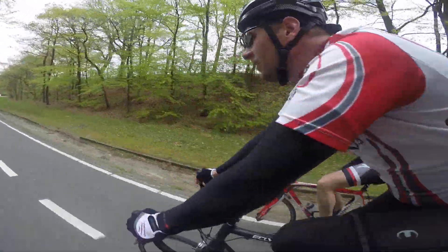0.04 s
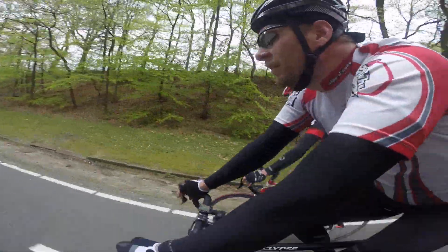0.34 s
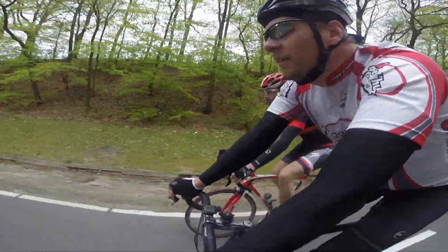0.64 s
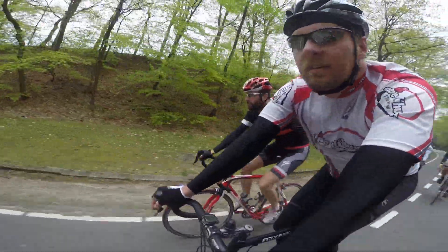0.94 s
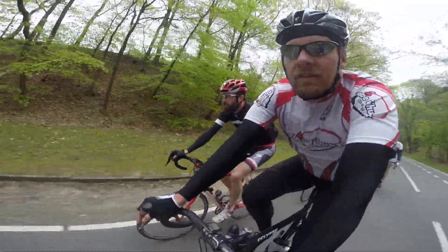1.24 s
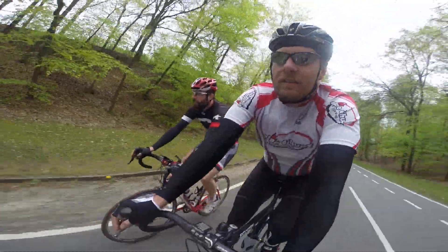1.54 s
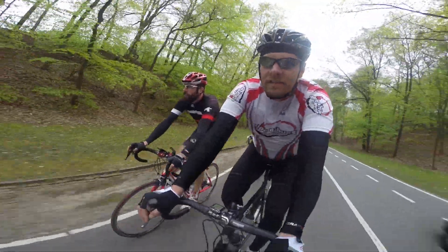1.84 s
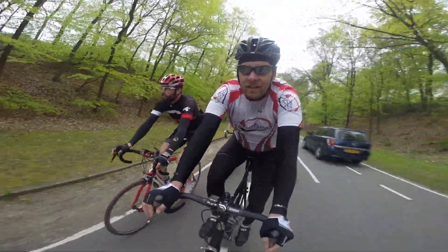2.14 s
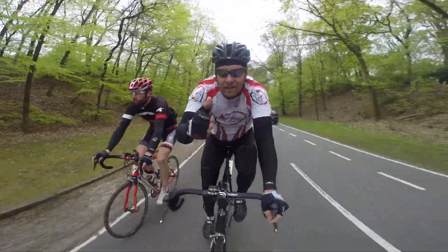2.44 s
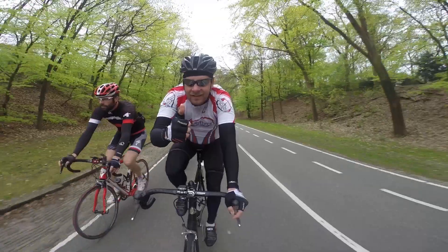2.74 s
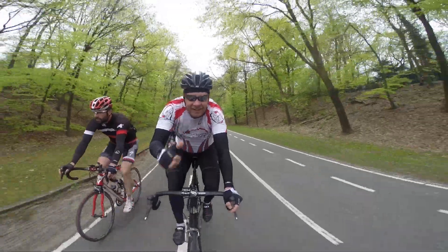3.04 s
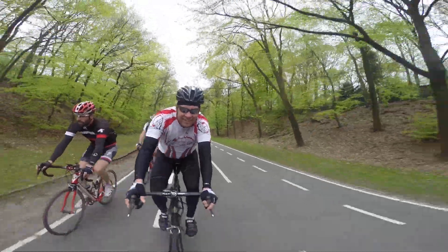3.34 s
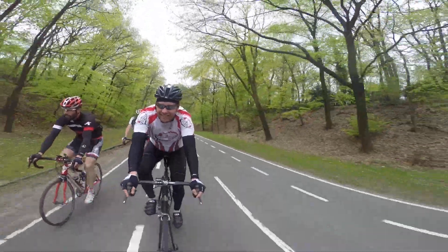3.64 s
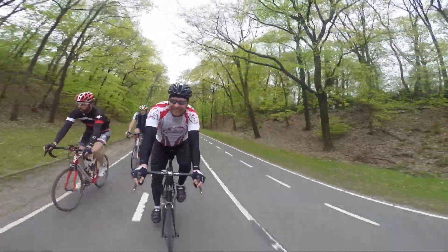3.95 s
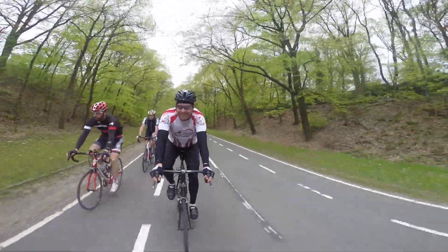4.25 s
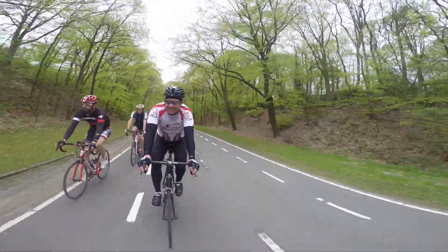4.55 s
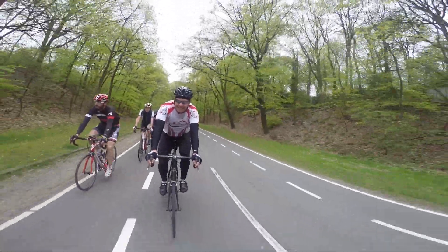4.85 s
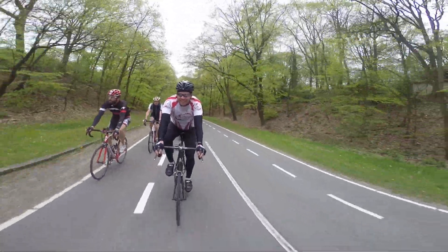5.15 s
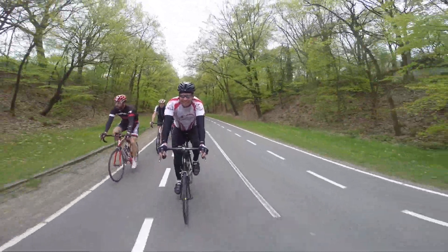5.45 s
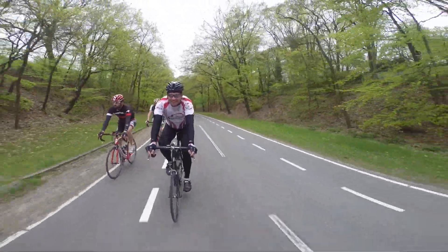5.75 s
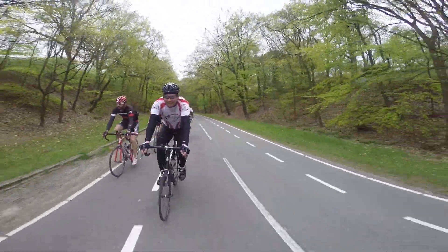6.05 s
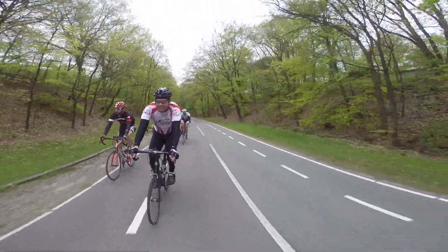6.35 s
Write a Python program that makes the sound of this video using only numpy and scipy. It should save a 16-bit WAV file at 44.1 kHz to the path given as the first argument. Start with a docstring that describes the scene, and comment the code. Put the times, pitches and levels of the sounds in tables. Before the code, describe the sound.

Wind rumbles and flutters on a cased microphone fixed to a bicycle riding along a road, over a steady rush of tyres and air. Faint gear clicks and a soft knock come early. A car swells up, passes close about two seconds in and quickly fades, with a few sharp ticks from the mount. The rush then carries on in gentle surges, with an occasional ping of grit.

```python
"""Wind buffets a cased camera on a bicycle riding along a wooded road: eddies press on the case as a low
rumble and flutter round its edges. Tyres and air rush, grains crackle, and road vibration drives the case
into resonance. A car passes the other way, its sound falling with distance. Impacts excite damped modes:
the mount ticks over bumps, grit pings off the frame, the case takes one soft knock and a nearby bicycle's
gears click. Under it all lies the camera's faint electronic whine."""
import sys
import numpy as np
from scipy import signal
from scipy.fft import rfft, irfft, next_fast_len
from scipy.io import wavfile
from scipy.ndimage import map_coordinates

SR = 44100
rng = np.random.default_rng(int(sys.argv[2]) if len(sys.argv) > 2 else 0)


def master(y):
    """Save y as 16-bit WAV."""
    cut = np.clip(np.atleast_2d(y).T, -1, 1)
    pcm = np.round(cut * 32767)  # scale
    wavfile.write(sys.argv[1], SR, pcm.astype(np.int16))


N = 282681

# Steady electronic tones: pitch_hz, rms_level_db
WHINE_TONES = [(8781, -76.5), (11687, -85), (11719, -85.5), (14626, -91)]
# Envelope of a thin high hiss that sets in late: time_s, level_db
HISS_ENVELOPE = [(4.74, -105), (4.79, -71), (5.3, -72.5), (6.41, -72.5)]

# Impacts on the mount, frame, case and gears: start_s, level_db
MOUNT_TICKS = [(1.4451, -20.5), (2.0472, -12), (2.3746, -19), (2.5042, -23), (3.9568, -32), (5.3561, -32)]
GRIT_HITS = [(.3155, -33), (3.7281, -21), (4.8291, -22)]
CASE_KNOCK = [(.4925, -18)]
GEAR_CLICKS = [(.0574, -37.5), (.1641, -45.5), (.7094, -39), (.8129, -36), (.8638, -37.5), (1.1384, -47),
               (1.2452, -44.5), (1.782, -42), (1.8892, -40), (1.9286, -40), (2.0084, -41.5), (2.1381, -42)]
# Normal modes of the struck parts: pitch_hz, gain_db, t60_s
MOUNT_MODES = [(1580, 0, 0.014), (2380, -14.5, 0.011), (4040, -21.5, 0.0069), (4760, -20, 0.015),
               (7950, -17, 0.0036)]
FRAME_MODES = [(2350, -5, 0.0096), (2620, 2, 0.0056), (3980, -14.5, .005), (7000, -14, 0.0084)]
CASE_BODY_MODES = [(170, 1.5, 0.011), (403, -5, 0.01), (750, -23, .005)]
GEAR_MODES = [(5300, -6, 0.0078), (5860, 0, 0.0098), (6660, 2, 0.0047), (8760, -3.5, 0.006),
              (9260, -9, 0.0058), (11100, -20, .005), (13100, -14, .006)]
# Resonances of the case under road vibration: pitch_hz, bandwidth_hz, gain_db
CASE_RESONANCES = [(1518, 106, 5), (1674, 92, -8.5)]

# Noise spectra of the car, the rush and the wind: frequency_hz, relative_density_db
CAR_ROAR_SPECTRUM = [(150, -18), (500, -7.5), (950, 2), (1500, 2), (2200, 3), (3300, -5), (4500, -21),
                     (9000, -60)]
CAR_HISS_SPECTRUM = [(1200, -20), (3200, 10), (4200, 2.5), (5200, 0.5), (6500, -1), (8000, -10), (9700, -7),
                     (11000, -25), (13000, -32), (15000, -48)]
CAR_RUMBLE_SPECTRUM = [(100, -6), (190, -1), (310, 2.5), (450, -8), (800, -45.5)]
RUSH_SPECTRUM = [(100, 4), (400, -10.5), (700, -6), (1100, -7.5), (1550, -10), (1950, -3), (2300, 3),
                 (2550, 2), (2950, -6.5), (3080, -6.5), (3160, 1), (3400, -6.5), (4000, -16.5), (5500, -53)]
FIZZ_SPECTRUM = [(2500, -48), (4000, 2), (4750, 4), (5200, 0.5), (5800, 5.5), (6200, 2), (6700, 4.5),
                 (8000, -4.5), (9700, -12), (10900, -27), (13000, -21), (15000, -28)]
FLUTTER_SPECTRUM = [(30, -37), (70, -4), (115, -0.5), (200, -8), (300, -15.5), (500, -22.5), (900, -34),
                    (2000, -48), (6000, -92)]
BUFFET_SPECTRUM = [(3, -23), (10, -2.5), (22, -2), (40, -3.5), (60, -11), (90, -17.5), (200, -40),
                   (500, -100)]

# Surges of the rush, about two a second in the later half: peak_s, length_s, rise_db
FLOW_SURGES = [(3.23, 0.16, 0.9), (3.752, 0.4, 1.8), (4.02, 0.3, 2), (4.408, 0.47, 4.6), (4.82, 0.22, 3.5),
               (5.29, 0.38, 4.2), (5.72, 0.44, 3)]
# Envelopes before the surges are added: time_s, level_db
FLOW_ENVELOPE = [(0, -46.5), (.5, -47.5), (1.02, -46.5), (1.13, -42), (1.5, -42.5), (1.78, -41.5),
                 (2.05, -45), (2.3, -43), (2.62, -47), (2.93, -47.5), (3.15, -45), (4.2, -46.2),
                 (5.05, -45.5), (5.55, -45), (6.17, -46), (6.41, -45)]  # steady rush of air and tyres
RING_ENVELOPE = [(0, -47.5), (.52, -48), (.72, -42.5), (1.05, -44), (1.62, -40.5), (1.88, -35.5),
                 (2.2, -48.5), (2.64, -53), (2.78, -44.5), (2.94, -49), (3.17, -40), (3.68, -42),
                 (3.86, -47.5), (3.99, -38.5), (4.18, -43.5), (4.97, -45), (5.36, -42.5), (6.41, -45)]  # the case's ring as the asphalt changes
FLUTTER_ENVELOPE = [(0, -41), (.42, -44), (.75, -45), (1.2, -40), (1.52, -42.5), (1.85, -37), (2.4, -38),
                    (2.65, -43.5), (3.7, -40), (5.0, -39), (5.6, -39), (6.41, -39.5)]  # small eddies at the case's edges
# Envelope of the low buffeting on the case: time_s, level_db
BUFFET_ENVELOPE = [(0, -27.5), (.42, -23.5), (.6, -29), (.95, -28.5), (1.3, -32), (1.56, -30),
                   (1.85, -31.5), (2.05, -25), (2.55, -31), (3.45, -26.5), (3.8, -25.5), (5.0, -30),
                   (5.6, -28.5), (6.41, -30)]


def amp(db):
    """Decibels to amplitude ratio."""
    return 10 ** (np.asarray(db) / 20)


def unit(x):
    """Normalisation to rms 1."""
    return x / np.sqrt(np.mean(x ** 2) + 1e-20)


def envelope_db(rows):
    """Linear interpolation of (time_s, level_db) rows, one value per sample."""
    times, levels = np.transpose(rows)
    return np.interp(np.arange(N) / SR, times, levels)


def wobble(knots_per_s):
    """Smooth random modulation: a spline through Gaussian knots."""
    knots = rng.standard_normal(int(N * knots_per_s / SR) + 4)
    return map_coordinates(knots, [np.arange(N) * knots_per_s / SR])


def filtered(x, response):
    """Linear filtering: the spectrum of x is multiplied by a frequency response."""
    size = next_fast_len(N + SR // 2)
    return irfft(rfft(x, size) * response(np.fft.rfftfreq(size, 1 / SR)), size)[:N]


def noise(spectrum):
    """White noise shaped by (frequency_hz, relative_density_db) rows on a log axis, at rms 1."""
    freqs, levels = np.transpose(spectrum)
    response = lambda hz: amp(np.interp(np.log(hz + 1), np.log(freqs), levels))
    return unit(filtered(rng.standard_normal(N), response))


def bandpass(x, band_hz):
    """Butterworth filtering attenuates what lies outside the band."""
    return signal.sosfilt(signal.butter(2, band_hz, "bandpass", fs=SR, output="sos"), x)


def strikes(events, modes, band_hz):
    """Modal superposition: each blow excites decaying sinusoids at slightly random strengths."""
    blows = np.zeros(N + SR)
    t = np.arange(SR // 10) / SR
    for start_s, level_db in events:
        for hz, gain_db, t60_s in modes:
            strength = amp(level_db + gain_db + rng.standard_normal())
            decay = amp(-60 * t / t60_s)
            blows[round(start_s * SR):][:len(t)] += strength * decay * np.sin(2 * np.pi * hz * t)
    return bandpass(blows[:N], band_hz)  # small parts radiate no bass, soft contacts no top


def surge_db():
    """Each surge lifts the level along a raised cosine."""
    t = np.arange(N) / SR
    return sum(rise_db * np.cos(np.pi * np.clip((t - peak_s) / length_s, -.5, .5)) ** 2
               for peak_s, length_s, rise_db in FLOW_SURGES)


def flow_db():
    """The steady flow plus its surges: the level that rush, crackle and fizz follow."""
    return envelope_db(FLOW_ENVELOPE) + surge_db()


def camera_whine():
    """Electronic self-noise: steady tones over a faint floor, and a high hiss that sets in."""
    t = np.arange(N) / SR
    tones = sum(np.sqrt(2) * amp(db) * np.sin(2 * np.pi * hz * t) for hz, db in WHINE_TONES)
    floor = amp(-68.5) * noise([(3000, 2.5), (9500, -5), (11000, -3), (13500, -6), (15200, -13)])
    hiss = noise([(10000, -60), (11200, -8), (12100, 3), (13100, -3.5), (14200, -16), (15000, -40)])
    return tones + floor + amp(envelope_db(HISS_ENVELOPE)) * hiss


def tyre_crackle(grains_per_s=76, re_flow_db=-21.0, spread_db=1.5):
    """Shot noise: fine grains snap under the tyres at random, louder when the rush swells."""
    hits = rng.random(N) < grains_per_s / SR
    sizes = amp(spread_db * np.minimum(rng.exponential(size=N), 3))
    return amp(flow_db() + re_flow_db) * unit(bandpass(hits * sizes, band_hz=(2200, 6800)))


def gear_clicks(settle_s=0.0043):
    """Impact and contact chatter: the chain snaps onto a tooth and rings the gears as it settles."""
    t = np.arange(SR // 25) / SR
    chatter = 0.08 * rng.standard_normal(len(t)) * np.exp(-t / settle_s)
    chatter[0] = 1  # the first contact
    clicks = strikes(GEAR_CLICKS, GEAR_MODES, band_hz=(4300, 14500))
    return amp(-2.5) * signal.fftconvolve(clicks, chatter)[:N]


def rattles():
    """Damped free vibration: mount, frame and case ring briefly after each blow."""
    mount = strikes(MOUNT_TICKS, MOUNT_MODES, band_hz=(1160, 8200))
    frame = strikes(GRIT_HITS, FRAME_MODES, band_hz=(1760, 6000))
    case = strikes(CASE_KNOCK, CASE_BODY_MODES, band_hz=(60, 900))
    return mount + frame + case


def passing_car(alongside_s=1.824, closing_m_per_s=20.5, gap_m=4.4):
    """Spherical spreading and directivity: pressure falls as 1/r, and the tyres' tone turns with angle."""
    t = np.arange(N) / SR
    nearness = gap_m / np.hypot(gap_m, closing_m_per_s * (t - alongside_s))  # 1 when alongside
    side_beam = nearness ** 0.92  # the roar beams sideways
    horn_gain = np.sqrt(1 + 1.3 * (1 - nearness ** 2))  # the tyres' horn throws hiss fore and aft
    roar = amp(-41) * side_beam * noise(CAR_ROAR_SPECTRUM)
    hiss = amp(-53) * horn_gain * noise(CAR_HISS_SPECTRUM)
    rumble = amp(-47) * noise(CAR_RUMBLE_SPECTRUM)
    # camera and riders shield the roar and hiss except while the car is in the open
    emerges_s, hides_s, edge_s, shield_db = 1.05, 2.44, 0.05, -27
    in_open = (np.tanh((t - emerges_s) / edge_s) - np.tanh((t - hides_s) / edge_s)) / 2
    shielding = amp(shield_db * (1 - in_open))
    return nearness * (shielding * (roar + hiss) + rumble)


def mounted_case_response(hz):
    """Transmissibility: the mount passes one band of vibration on to the case's resonances."""
    mount = 1 / (1 + ((hz - 1600) / 480) ** 4)
    case = sum(amp(db) * 1j * hz * width_hz / (pitch_hz ** 2 - hz ** 2 + 1j * hz * width_hz)
               for pitch_hz, width_hz, db in CASE_RESONANCES)
    return mount * case


def road():
    """Forced vibration: the asphalt's grain shakes the case into a rough ring as tyres and air rush."""
    roughness = wobble(70)
    rush = amp(flow_db() + 1.0 + 0.76 * roughness) * noise(RUSH_SPECTRUM)
    jolts = rng.standard_normal(N) * amp(0.37 * roughness + 2.1 * wobble(300))
    ring_db = envelope_db(RING_ENVELOPE) + 0.77 * surge_db()
    ring = amp(ring_db) * unit(filtered(jolts, mounted_case_response))
    return rush + ring


def wind():
    """Turbulent pressure: large eddies buffet the case, small ones flutter at its edges, the finest fizz."""
    buffet = amp(envelope_db(BUFFET_ENVELOPE)) * noise(BUFFET_SPECTRUM)
    flutter_db = envelope_db(FLUTTER_ENVELOPE) + 0.91 * surge_db()
    flutter = amp(flutter_db) * unit(amp(1.27 * wobble(35)) * noise(FLUTTER_SPECTRUM))
    reference_flow_db = -45
    fizz_db = -59 + 1.06 * (flow_db() - reference_flow_db)
    flicker_db = 0.85 * wobble(30) + 1.26 * wobble(130)
    fizz = amp(fizz_db + flicker_db) * noise(FIZZ_SPECTRUM)
    return buffet + flutter + fizz


def scene():
    """Superposition in a free field: all sources add at one microphone."""
    tyres = road() + tyre_crackle()
    return (wind() + tyres + passing_car() + gear_clicks() + rattles() + camera_whine())[None]


def record(dry, cutoff_hz=15200):
    """Band limiting: the camera passes nothing above its cutoff."""
    return filtered(dry[0], lambda hz: hz < cutoff_hz)[None]


dry = scene()
out = record(dry)
master(out)
```